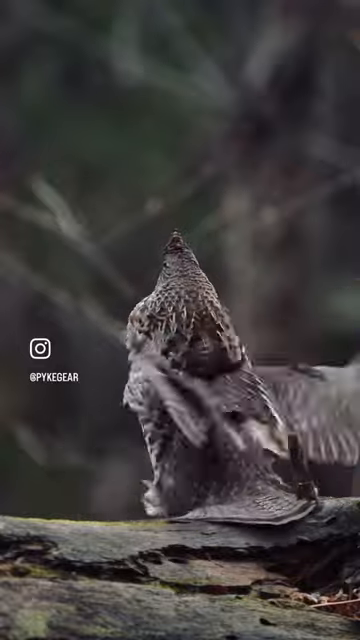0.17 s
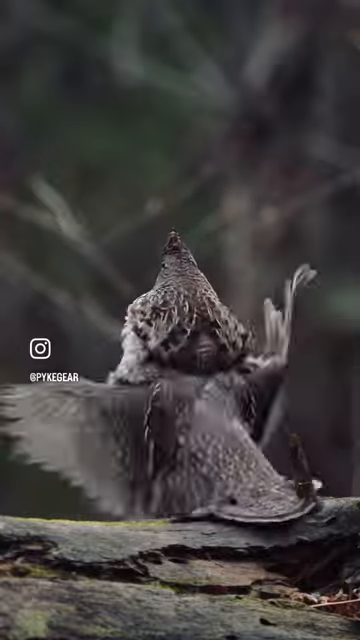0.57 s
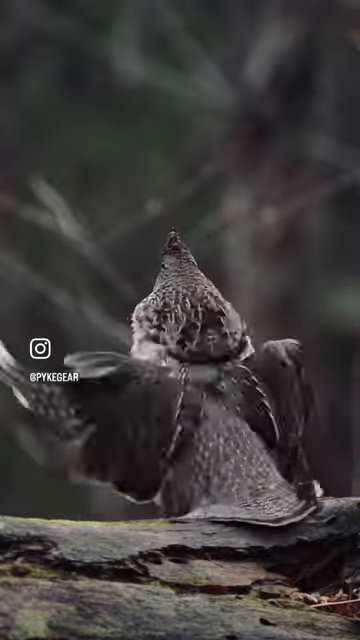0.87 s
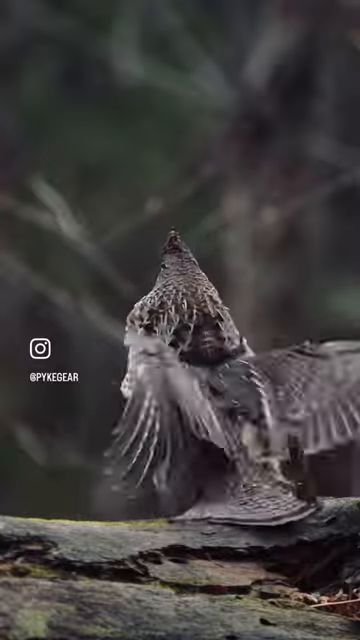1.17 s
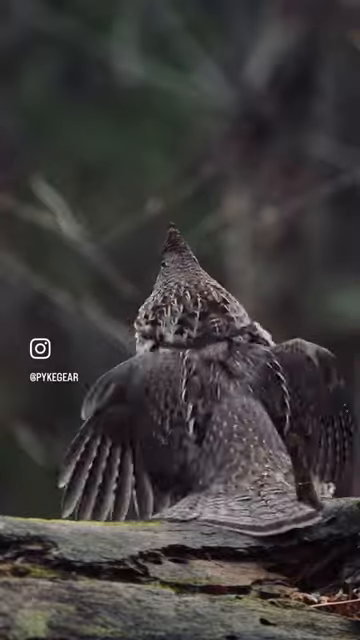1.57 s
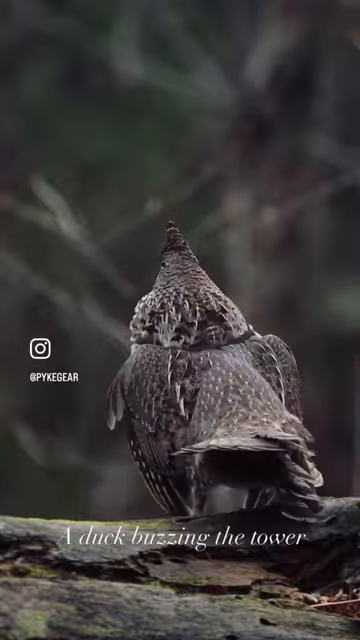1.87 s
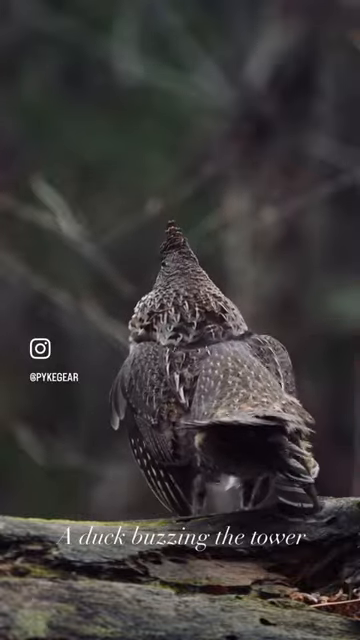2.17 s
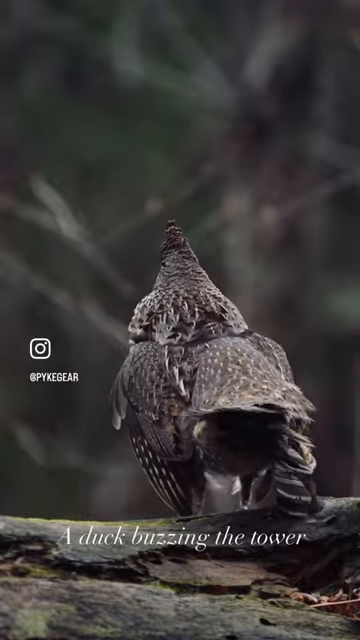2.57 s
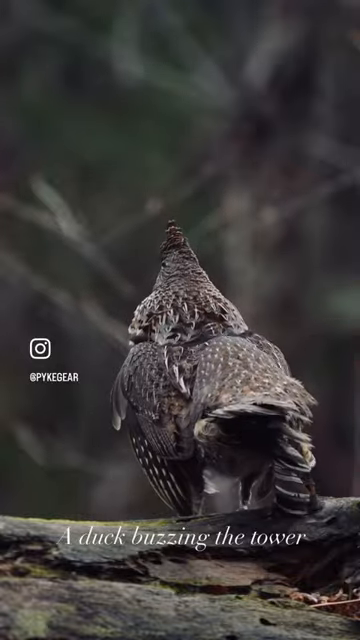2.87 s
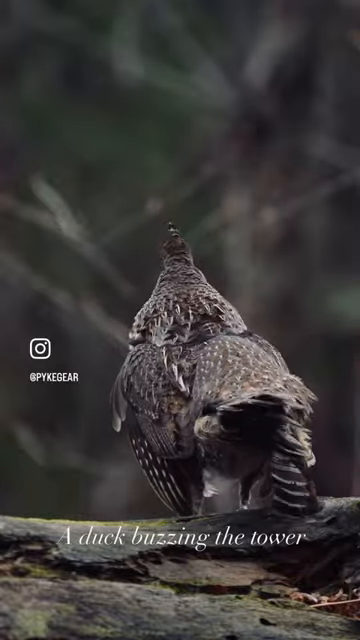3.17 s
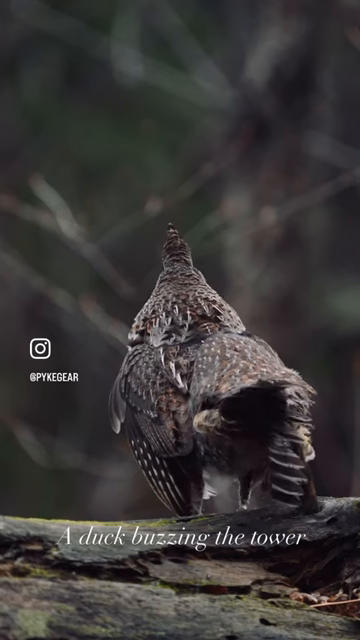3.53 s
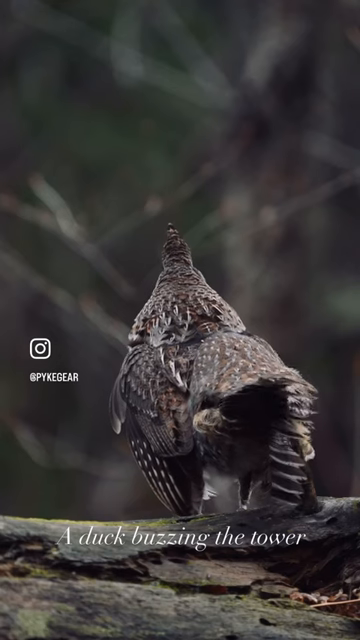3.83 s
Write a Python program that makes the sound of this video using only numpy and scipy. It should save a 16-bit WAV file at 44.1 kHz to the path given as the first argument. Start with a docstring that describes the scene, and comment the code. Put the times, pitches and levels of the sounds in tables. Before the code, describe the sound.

Close, heavy wing thumps run fast, slow down and end before halfway; a duck keeps quacking louder with woodland echo, over distant soft drumming, frog trills, small bird peeps and low wind rumble on the microphone.

```python
"""A grouse on a log drums with its wings: low air thumps and a feather swish, speeding up, then slowing to a stop.
A second grouse drums far off with thumps alone. A duck flies near with raspy quacks: throat pulses that ring
several tones, plus hiss. Small frogs are narrow bands of noise and trilling tones; a bird peeps sagging whistles.
Soft noise is the hush of the wood, and slow wind rocks the microphone with very low noise."""
import sys
import numpy as np
from scipy import signal
from scipy.fft import rfft, irfft, next_fast_len
from scipy.io import wavfile
from scipy.ndimage import uniform_filter1d, map_coordinates

SR = 44100
rng = np.random.default_rng(int(sys.argv[2]) if len(sys.argv) > 2 else 0)


def master(y):
    """Save y as 16-bit WAV."""
    cut = np.clip(np.atleast_2d(y).T, -1, 1)
    pcm = np.round(cut * 32767)  # scale
    wavfile.write(sys.argv[1], SR, pcm.astype(np.int16))


def nominal_scale(level):
    """Amplitude ratio for a level in decibels (scalar or array-like)."""
    x = np.asarray(level, float) / 20
    return 10 ** x


N = 176400

# Hush of the wood, first row unused: f/Hz, relative level/dB
WOOD_SPECTRUM = [(59, -30), (100, 2), (118, -4), (149, -1), (326, -5), (508, -7.5), (683, -11),
                 (743, -11.5), (1160, -13), (1840, -15.5), (2000, -16.5), (2930, -20), (15500, -31)]
WOOD_DB = -40
# Strength of the wind: t/s, level/dB
WIND_LEVEL = [(0.0, -20.5), (1.18, -17.5), (1.21, -25.5), (1.68, -19.5), (1.87, -33.5), (2.0, -22),
              (2.13, -35), (2.22, -18.5), (2.38, -29), (2.43, -16.5), (3.0, -17.5), (3.07, -28),
              (3.21, -12.5), (4.0, -21)]
# Tone of the wind on the microphone: f/Hz, relative level/dB
WIND_SPECTRUM = [(2, -120), (4, -12), (9, 6), (16, -1), (22, -8), (30, -12.5), (50, -18.5), (110, -52),
                 (200, -72)]

# Loudness of the frog chorus, before its flutter: t/s, level/dB
CHORUS_LEVEL = [(0, -45.5), (.5, -43.5), (1.2, -47.5), (1.55, -43.5), (1.75, -44), (2.05, -55.5),
                (2.45, -49), (2.6, -61), (2.8, -57), (3.3, -46.5), (3.5, -63), (4, -63)]
# Pitch bands of the chorus: f/Hz, width/Hz, relative level/dB
CHORUS_BANDS = [(2270, 170, -3), (2622, 41, 1.5), (2787, 59, -2)]
# Single frogs, before their trill: start t/s, length/s, start f/Hz, end f/Hz, level/dB
FROG_CALLS = [(.49, 0.051, 2760, 2760, -52), (.74, .07, 2740, 2720, -44), (1.55, .5, 2545, 2565, -48.5),
              (2.74, 0.27, 2620, 2830, -51), (3.17, 0.5, 2540, 2535, -50.5),
              (3.2, 0.078, 2860, 2910, -51.5)]
TRILL_HZ = 37.4

# Wing beats close by: t/s, relative beat level/dB, extra swish level/dB
NEAR_BEATS = [(0.0092, -2.5, 1), (0.0873, -3, -2.5), (0.1603, -2.5, -4.5), (0.225, -3, -2.5),
              (0.2795, -1, 4), (0.3326, -2.5, 2), (0.3977, -2.5, -1.5), (0.4675, -2.5, 0), (0.543, -4, -1),
              (0.6268, -3.5, -0.5), (0.718, -3.5, -0.5), (0.8184, -2.5, -0.5), (0.9243, -3, 1.5),
              (1.0404, -4, 1), (1.1657, -4.5, 2), (1.2994, -4.5, 3.5), (1.4449, -3.5, 2.5)]
# Wing beats far off: t/s, relative beat level/dB
FAR_BEATS = [(1.3556, -19.5), (1.5088, -22.6), (1.6523, -23.5), (1.7876, -20.1), (1.9146, -21.9),
             (2.0348, -21.9), (2.1473, -22.9), (2.2533, -22.1), (2.3547, -22.8), (2.4521, -22.2),
             (2.5416, -21.5), (2.627, -20.9), (2.7066, -22.0), (2.7813, -23.9), (2.8507, -22.2),
             (2.9145, -24.1), (2.9732, -21.5), (3.0271, -20.5), (3.0852, -22.5), (3.1506, -24.7),
             (3.2193, -21.7), (3.2935, -23.5), (3.3728, -21.5), (3.4583, -20.1), (3.5495, -22.9),
             (3.6493, -22.1), (3.7565, -22.3), (3.8722, -22.4)]
NEAR_PUSH, FAR_PUSH = 0.98, 0.65  # height of the push, where the suction is 1
PUSH_S, PUSH_LEAD_S = 0.0026, 0.0047  # width; centre before the beat
SUCK_S, SUCK_LAG_S = 0.0029, 0.0017  # width; centre after the beat
REBOUND_HZ, NEAR_Q, FAR_Q = 37, 0.85, 0.6  # the air swings back; a higher Q swings longer

# Tone of the feather swish: f/Hz, relative level/dB
SWISH_SPECTRUM = [(80, -15.5), (170, -2), (250, -18.5), (320, -8.5), (420, -14), (877, -12), (1570, -18.5),
                  (2760, -26), (4390, -31.5), (8490, -38), (12000, -47.5), (15500, -47)]
SWISH_DB, SWISH_LEAD_S, SWISH_S = -22.5, 0.0016, 0.0049  # against the beat; centre before it; width
# Softer rush of the downstroke: against the swish, start before the beat, rise time, fade time after it
STROKE_DB, STROKE_S, STROKE_RISE_S, STROKE_END_S = -13, 0.0232, 0.002, 0.025
RUSH_DB, RUSH_S = -18, 0.038  # stirred air around each beat: against the swish; width
HURRY_DB = 2.5  # rush gained for each doubling of the beat rate above 10 a second
# Feather snaps: t/s, relative level/dB
SNAPS = [(0.1344, -27.5), (0.2016, -23), (0.265, -31), (0.3184, -35), (0.3735, -31), (0.4429, -28),
         (0.6987, -31)]
SNAP_T60_S, SNAP_HZ = 0.017, 790  # time to fade by 60 dB; where a snap is strongest

# Quacks: start t/s, length/s, relative level/dB, middle ring's open f/Hz,
# upper ring's extra level/dB, hiss's extra level/dB, whistle rings' extra level/dB
QUACKS = [(0.541, 0.2, -38, 2356, -6.5, 3, -6), (1.278, .252, -33.5, 2420, -1.5, 4, -4),
          (2.065, 0.26, -30.5, 2206, -0.5, 0, 4), (2.885, .268, -30, 2274, 2, 4.5, -6),
          (3.807, .29, -27, 2120, 0, 7.5, 0)]
# Bill through a quack: share of its length, opening (0 shut, 1 wide, under 0 pressed tighter than shut),
# level/dB
BILL = [(0, 0, -11), (.07, .05, -5), (.3, 0.4, -1.5), (.5, 0.73, -0.5), (.68, 0.94, -1), (.87, 0.94, 0.5),
        (.93, -.5, -5.5), (0.999, -.7, -9.5)]
# Throat rings (each quack sets the second one's open pitch): shut f/Hz, open f/Hz, shut level/dB, open level/dB
THROAT = [(1737, 1846, -1.5, -8.5), (2020, 2250, -2, -1.5), (2640, 2646, -20.5, 0), (1256, 1330, -15, -22),
          (3370, 3250, -41, -16), (5250, 5200, -50, -20)]
RASP_START_HZ, RASP_END_HZ, JITTER = 77.2, 89.35, 0.045  # pulses a second; uneven share of each gap
RING_S, RING_LAG_S = 0.0019, 0.001  # width of each ring's swell; typical lateness
DETUNE, SCATTER_DB = 0.027, 2.8  # random pitch share and level from pulse to pulse
# Tone of the husky noise in each pulse: f/Hz, relative level/dB
HUSK_SPECTRUM = [(1200, -24), (1600, -5), (2200, 2), (2800, -2.5), (3400, -15), (4000, -36)]
HUSK_DB = -10
# Tone of the breathy hiss: f/Hz, relative level/dB
HISS_SPECTRUM = [(3500, -12.5), (5000, -5.5), (6200, -0.5), (7300, -7), (9000, -25)]
HISS_SHUT_DB, HISS_OPEN_DB = -27.5, -17
HISS_STEADY = 0.74  # share of the hiss that flows on between pulses
# How long the wood's answer takes to fade by 60 dB: f/Hz, fade time/s
TREE_FADE = [(1000, 0.065), (2500, 0.37), (7000, 0.23)]
TREES_DB = -5.5

# Bird peeps, before their flutter: start t/s, length/s, start f/Hz, level/dB
PEEPS = [(1.239, 0.053, 4240, -42), (1.284, 0.063, 4010, -48), (1.607, 0.04, 4320, -51),
         (1.637, 0.042, 3630, -51), (1.768, .06, 4270, -53), (1.9, 0.03, 4280, -61),
         (3.74, 0.033, 4495, -51)]
PEEP_SAG = 0.0335  # share by which the pitch falls

CEILING, KNEE = 1, 3.5  # limit of the soft overload; a higher knee bends later
OFFSET = 0.0023


def unit(x):
    """Scales a sound to an rms (average strength) of 1."""
    return x / np.sqrt(np.mean(x ** 2) + 1e-20)


def along(points, hz):
    """Reads (Hz, value) points on a log frequency axis."""
    f, v = np.transpose(points)
    return np.interp(np.log(hz + 1), np.log(f + 1), v)


def curve(rows):
    """Joins (s, value) points into one value per sample."""
    return np.interp(np.arange(N) / SR, *np.transpose(rows))


def wobble(rate):
    """A smooth random curve with rate knots a second."""
    knots = rng.standard_normal(int(N * rate / SR) + 4)
    return map_coordinates(knots, [np.arange(N) * rate / SR])


def filtered(x, response):
    """Shapes a sound by a (complex) response to each frequency."""
    m = next_fast_len(N + SR // 2)
    return irfft(rfft(x, m) * response(np.fft.rfftfreq(m, 1 / SR)), m)[:N]


def noise(spectrum):
    """Coloured noise of rms 1."""
    return unit(filtered(rng.standard_normal(N), lambda hz: nominal_scale(along(spectrum, hz))))


def bell(t, width):
    """A smooth bump (Gaussian)."""
    return np.exp(-0.5 * (t / width) ** 2)


def air():
    """The hush of the wood, and low wind pressure on the microphone."""
    hush = noise([(40, -12)] + WOOD_SPECTRUM[1:])
    wind = nominal_scale(curve(WIND_LEVEL)) * noise(WIND_SPECTRUM)
    return nominal_scale(WOOD_DB + 1.03 * wobble(3.496)) * hush + wind


def frogs():
    """Many frogs blur into narrow noise bands; single frogs are gliding tones that pulse in a trill."""
    t, singles = np.arange(N) / SR, np.zeros(N)
    bands = lambda hz: sum(nominal_scale(db) * bell(hz - centre, width) for centre, width, db in CHORUS_BANDS)
    blur = unit(filtered(rng.standard_normal(N), bands))
    chorus = nominal_scale(curve(CHORUS_LEVEL) + 2.85 * wobble(35.04)) * blur
    trill = 1 + 0.29 * np.sin(2 * np.pi * TRILL_HZ * t + 2 * wobble(6))
    trill = trill * nominal_scale(5.4 * wobble(14))
    for start, length, from_hz, to_hz, db in FROG_CALLS:
        u = np.clip((t - start) / length, 0, 1)
        swell = np.abs(np.sin(np.pi * u)) ** 0.36 * (u < 1)
        cycles = length * u * (from_hz + (to_hz - from_hz) * u / 2)
        singles += nominal_scale(db) * swell * np.sin(2 * np.pi * cycles + 0.94 * wobble(60))
    return chorus + trill * singles


def thumps(beats, push, q):
    """Each wing beat pushes air, sucks it back hard, and the air rebounds."""
    t = np.arange(N) / SR
    shape = lambda u: push * bell(u + PUSH_LEAD_S, PUSH_S) - bell(u - SUCK_LAG_S, SUCK_S)
    rebound = lambda hz: -hz ** 2 / (REBOUND_HZ ** 2 - hz ** 2 + 1j * hz * REBOUND_HZ / q)
    strokes = sum(nominal_scale(db) * shape(t - s) for s, db, *_ in beats)
    return filtered(strokes, rebound)


def feathers():
    """Air rushes through the feathers in each downstroke, peaks near the beat; a few feathers snap."""
    t, level = np.arange(N) / SR, np.zeros(N)
    rates = 1 / np.gradient([s for s, *_ in NEAR_BEATS])  # beats a second
    for (s, db, swish_db), rate in zip(NEAR_BEATS, rates):
        u = t - s
        rise = np.clip((u + STROKE_S) / STROKE_RISE_S, 0, 1)
        stroke = rise * np.exp(-np.maximum(u, 0) / STROKE_END_S)
        flow = nominal_scale(STROKE_DB) * stroke + nominal_scale(RUSH_DB) * bell(u, RUSH_S)
        flow *= nominal_scale(HURRY_DB * np.log2(rate / 10))
        peak = nominal_scale(swish_db) * bell(u + SWISH_LEAD_S, SWISH_S)
        level += nominal_scale(db + SWISH_DB) * (peak + flow)
    swish = level * nominal_scale(2.02 * wobble(300)) * noise(SWISH_SPECTRUM)
    snaps = sum(nominal_scale(db - 4.0 - 60 * np.abs(t - s) / SNAP_T60_S) * (t >= s) for s, db in SNAPS)
    snap_tone = lambda hz: np.sqrt(hz / (hz ** 2 + SNAP_HZ ** 2))
    crack = unit(filtered(rng.standard_normal(N), snap_tone))
    return swish + snaps * crack


def duck():
    """Slow throat pulses ring tones that shift and brighten as the bill opens and shuts; breath hisses along."""
    voice, hiss_level, husk_level = np.zeros((3, N + SR))
    t = np.arange(SR // 50) / SR  # time within one pulse
    share, opening, bill_db = np.transpose(BILL)
    shut_hz, open_hz, shut_db, open_db = np.transpose(THROAT)
    middle = np.arange(len(THROAT)) == 1
    upper = (shut_hz > 2400) & (shut_hz < 4000)
    whistle = shut_hz > 4000
    for start, length, db, middle_hz, upper_db, hiss_db, whistle_db in QUACKS:
        wide_hz = np.where(middle, middle_hz, open_hz)
        s = 0  # time since the quack began
        for pitch, loudness, phase, gap, late in rng.standard_normal((40, 5, len(THROAT))):
            u = s / length
            o = np.interp(u, share, opening)
            hz = (shut_hz + o * (wide_hz - shut_hz)) * (1 + DETUNE * pitch * ~whistle)
            ring_db = shut_db + o * (open_db - shut_db) + SCATTER_DB * loudness
            gain = nominal_scale(ring_db + upper_db * upper + whistle_db * whistle)
            swell = bell(t - 2 * RING_S - RING_LAG_S * np.abs(late[:, None]), RING_S)
            rings = gain @ (swell * np.sin(2 * np.pi * hz[:, None] * t + 10 * phase[:, None]))
            pulse = (u <= 1) * nominal_scale(db + 5.5 + np.interp(u, share, bill_db))  # silent after the quack
            breath_db = HISS_SHUT_DB + o * (HISS_OPEN_DB - HISS_SHUT_DB) + hiss_db
            at = round((start + s - RING_S) * SR)
            voice[at:at + len(t)] += pulse * rings
            hiss_level[at:at + len(t)] += pulse * swell[0] * nominal_scale(breath_db)
            husk_level[at:at + len(t)] += pulse * swell[1]
            rate = RASP_START_HZ + (RASP_END_HZ - RASP_START_HZ) * min(u, 1)
            s += (1 + JITTER * gap[0]) / rate
    steady = uniform_filter1d(hiss_level, size=SR // 40)
    breath = HISS_STEADY * steady + (1 - HISS_STEADY) * hiss_level
    husk = nominal_scale(HUSK_DB) * husk_level[:N] * noise(HUSK_SPECTRUM)
    return voice[:N] + husk + breath[:N] * noise(HISS_SPECTRUM)


def trees(x):
    """The wood answers with a noisy echo in which each frequency dies at its own speed."""
    hz, t, z = signal.stft(rng.standard_normal(SR), SR, nperseg=256)
    fade = nominal_scale(-60 * t / along(TREE_FADE, hz)[:, None])
    tail = signal.istft(z * fade, SR, nperseg=256)[1]
    late = np.pad(x, (200, 0))  # the echo starts 200 samples late
    return signal.fftconvolve(late, tail / np.linalg.norm(tail))[:N]


def bird():
    """Short thin whistles that sag in pitch, blurred by distance."""
    blur = 1.8 * wobble(160)
    t, out = np.arange(N) / SR, np.zeros(N)
    for start, length, hz, db in PEEPS:
        u = np.clip((t - start) / length, 0, 1)
        cycles = hz * length * u * (1 - PEEP_SAG * u / 2)
        out += nominal_scale(db) * np.sin(np.pi * u) * np.sin(2 * np.pi * cycles + blur)
    return out * nominal_scale(2.3 * wobble(82))


def scene():
    """Adds all sources; the duck and the bird also sound through the trees."""
    near = nominal_scale(2.3) * thumps(NEAR_BEATS, NEAR_PUSH, NEAR_Q)
    far = nominal_scale(3.5) * thumps(FAR_BEATS, FAR_PUSH, FAR_Q)
    voices = duck() + bird()
    echo = nominal_scale(TREES_DB) * trees(voices)
    return (air() + frogs() + near + far + feathers() + voices + echo)[None]


def roll_off(x):
    """The treble ends steeply here."""
    return signal.sosfilt(signal.butter(12, 15680, fs=SR, output="sos"), x)


def record(dry):
    """The loudest peaks overload softly, and a small constant offset is added."""
    held = dry / (1 + np.abs(dry / CEILING) ** KNEE) ** (1 / KNEE)
    return roll_off(held + OFFSET)


dry = scene()
out = record(dry)
master(out)
```